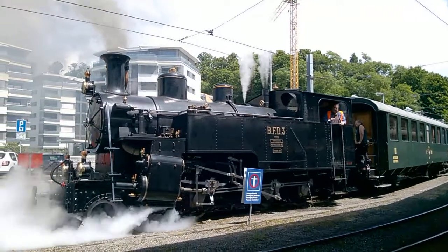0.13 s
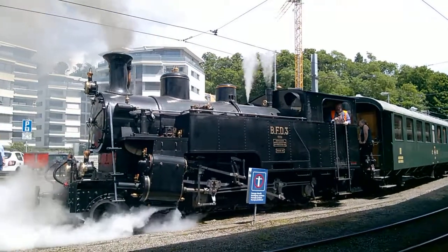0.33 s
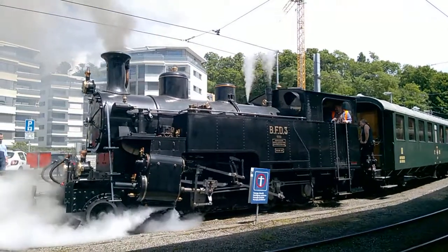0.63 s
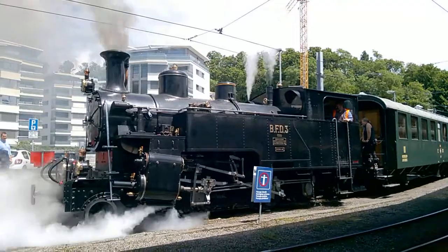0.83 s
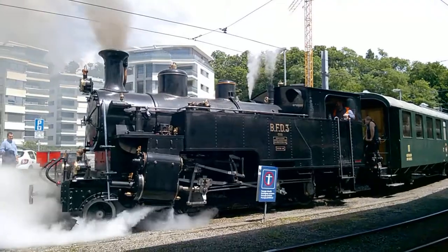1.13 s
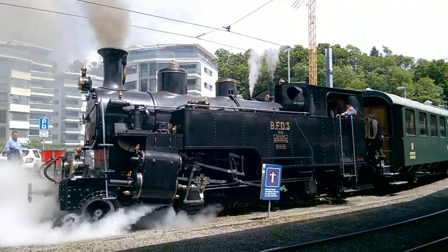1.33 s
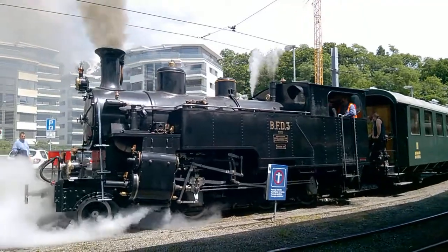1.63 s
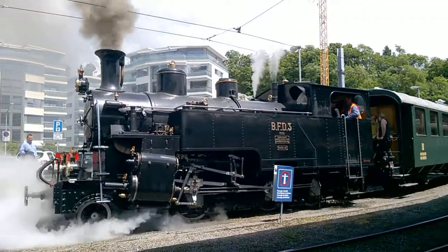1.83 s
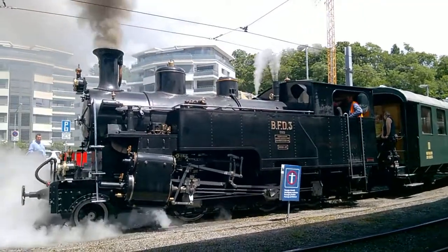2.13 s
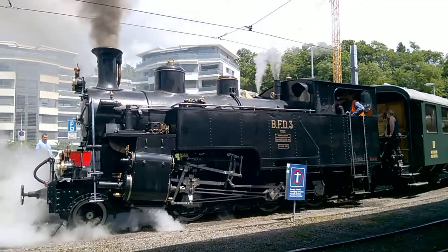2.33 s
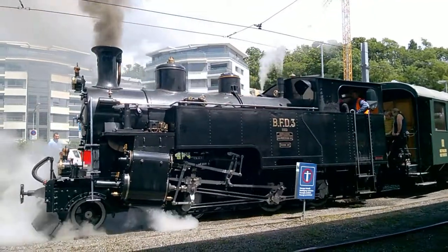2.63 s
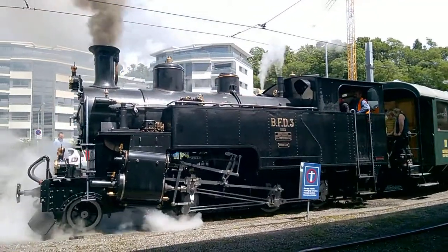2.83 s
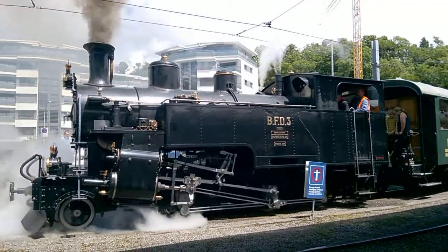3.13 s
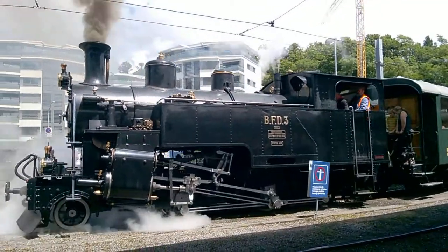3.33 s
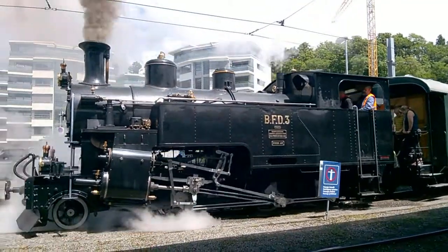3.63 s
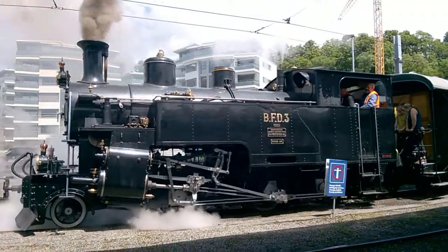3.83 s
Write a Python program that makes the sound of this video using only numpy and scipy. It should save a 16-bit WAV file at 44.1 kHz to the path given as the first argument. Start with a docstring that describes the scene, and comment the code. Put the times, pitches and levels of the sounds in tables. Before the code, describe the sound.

Loud, bright, rough steam hiss from a locomotive's drain pipe starts at full force, steady until about 0.5 s, then weakens in steps, its shrill edge sinking, gone by 2 s. A soft low chuff comes at 1.8 s, a weak spurt around 2.3-2.7 s, then a quieter, faintly whistling jet swells to 3.5 s and drops by 3.9 s. Smooth leaking steam and very faint wavering low hum and rumble continue beneath; open air, nearly mono.

```python
"""Steam locomotive with open drain cocks

A steam locomotive creeps through a station. A strong jet hisses through its drain pipe and dies away,
its shrill edge sinking with the pressure; a short spurt and a weaker second jet follow.
Each jet is flickering turbulence noise, shaped by flow, and the two main jets also by pressure.
Steam leaks steadily from the boiler top as smoother-coloured noise, and the chimney gives one soft chuff
of low noise. The engine rumbles as filtered noise and hums as two tones of wavering pitch."""
import sys
import numpy as np
from scipy import signal
from scipy.fft import rfft, irfft
from scipy.io import wavfile

SR = 44100
rng = np.random.default_rng(int(sys.argv[2]) if len(sys.argv) > 2 else 0)


def bounce(signal):
    """Save signal as a 16-bit WAV file at the path given by the first command-line argument."""
    frames = np.transpose(np.atleast_2d(signal))
    limited = np.clip(frames, -1, 1)
    pcm = np.round(limited * 32767).astype(np.int16)
    wavfile.write(sys.argv[1], SR, pcm)


N = 176400  # samples: 4 s
FRAME, HOP = 1024, 256  # samples per spectral frame, and between frames
TIME = np.arange(N) / SR
FRAME_S = np.arange(N // HOP + 2) * HOP / SR
BIN_HZ = np.maximum(np.arange(FRAME // 2 + 1) * SR / FRAME, 1)[:, None]


def from_db(db):
    """Logarithmic level: 20 dB is a tenfold amplitude."""
    return 10 ** (np.asarray(db) / 20)


def at_hz(rows, hz, axis=1):
    """Spectral envelope: one column of a table, interpolated over log frequency."""
    rows = np.array(rows)
    return np.interp(np.log(hz), np.log(rows[:, 0]), rows[:, axis])


def in_time(rows):
    """Temporal envelope: a curve interpolated at every frame."""
    times, values = np.transpose(rows)
    return np.interp(FRAME_S, times, values)


def bump(hz, centre_hz, width_hz):
    """Bell-shaped (Gaussian) band of height 1, with its width taken at half height."""
    return 2 ** -((2 * (hz - centre_hz) / width_hz) ** 2)


# Flow of the first jet before the shut-off: [t/s, level/dB]
FIRST_FLOW = [(0, -27.5), (.025, -29), (.055, -34), (.08, -35.5), (.112, -29.5), (.28, -29), (.355, -29.6),
              (.383, -32.5), (.415, -30), (.54, -30), (.7, -34.5), (.745, -32), (.83, -36), (1.07, -35.5),
              (1.14, -38), (1.21, -44), (1.28, -38), (1.38, -40), (1.435, -45.5), (1.48, -42), (1.56, -44),
              (1.66, -41.3), (1.8, -44.5), (1.95, -54)]
# Flow of the short spurt: [t/s, level/dB]
SPURT_FLOW = [(1.8, -64), (2.12, -58), (2.26, -49), (2.45, -48.5), (2.65, -50), (2.73, -55.5), (3.0, -54),
              (3.3, -56)]
# Flow of the second jet: [t/s, level/dB]
SECOND_FLOW = [(1.9, -71), (2.25, -59), (2.5, -49), (2.72, -50.5), (2.87, -49.5), (3.13, -45), (3.52, -43),
               (3.73, -44.8), (3.81, -48.5), (3.88, -55.5), (4.0, -62)]
# Pressure behind each main jet, relative to full: [t/s, level/dB]
FIRST_PRESSURE = [(0, 0), (.5, -1), (.85, -3.5), (1.25, -9), (1.9, -19)]
SECOND_PRESSURE = [(2.2, -8), (2.85, -8), (3.4, 0.5), (3.75, -1), (4, -4)]
# Turbulence at the full flow: [f/Hz, level/dB per Hz, gain/dB per dB of flow]
FIRST_HISS = [(100, -89.5, 2.5), (239, -91, -0.5), (404, -85, .5), (610, -75.5, 0), (1130, -79, 0.61),
              (1840, -72, 0.46), (3100, -75.5, .85), (4360, -71, 0.8), (5800, -75, 1), (8000, -73, 0.8),
              (11000, -73, 1.3), (12800, -80, 0.5), (16000, -82, 1.5)]
SPURT_HISS = [(100, -104, 0.54), (400, -93.5, .7), (750, -83.5, 1), (1300, -91, 0.43), (2500, -91.5, 1),
              (4300, -87.5, 0.44), (6000, -87, 1), (8000, -89, 1), (10000, -88.5, 1), (12000, -92, 1),
              (16000, -109, 1)]
SECOND_HISS = [(100, -103, .5), (400, -97, 0.36), (710, -91, 1), (1320, -92, 1), (1800, -84, 0.55),
               (2460, -88.5, 0.27), (4640, -86, 0.73), (8000, -87, 0.8), (10000, -89, 1), (12100, -94, 1),
               (14000, -99, 1), (16000, -108, 0.84)]
# Drain pipe resonances at full pressure: [f/Hz, width/Hz, lift/dB, lift gained/dB per dB of pressure]
FIRST_PIPE = [(740, 130, 2.5, .15), (1005, 60, 1.8, .2), (1312, 165, 14.8, 0), (1550, 130, -4, 0),
              (1760, 200, 4.7, 0), (2010, 120, 4.8, 0), (2340, 300, 10.3, .25), (2910, 130, 4, 0),
              (3970, 130, 2.5, .1), (4880, 400, 5.2, .7), (7600, 400, 2.8, .3), (9400, 400, 5.8, 1),
              (14350, 800, 7, 1.3)]
SPURT_PIPE = [(864, 81, 5, 0), (4050, 270, 4, 0), (5550, 300, 3, 0), (9350, 600, 7.1, 0)]
SECOND_PIPE = [(1181, 53, 25, 0), (1540, 144, 10.7, -0.3), (1860, 60, 7.9, 0), (2060, 190, 8, 0.22),
               (2970, 130, 5, -0.045), (4180, 89, 4.8, -.3), (4860, 130, 3, -0.28), (5422, 720, 5.4, 0.24),
               (6690, 220, 5, -0.28), (7540, 1000, 4.6, -0.05), (9450, 350, 4, 0)]
# Shrill orifice bands at full pressure: [f/Hz, width/Hz, lift/dB, glide/Hz per dB of pressure]
FIRST_SHRILL = [(8650, 1800, 5.2, 125)]
SECOND_SHRILL = [(10650, 890, 7.8, 52), (13600, 550, 7, 25)]
FIRST_FULL_DB, SPURT_FULL_DB, SECOND_FULL_DB = -30, -48, -43.5  # flow at full pressure, dB


def drain_cocks(shut_s=1.426, shut_length_s=0.59):
    """Superposition of jets: the first is slowly shut off, a spurt follows and the second builds up."""
    still_open = np.clip(1 - (TIME - shut_s) / shut_length_s, 0, 1)
    first_pressure = in_time(FIRST_PRESSURE)
    second_pressure = in_time(SECOND_PRESSURE)
    first = jet(FIRST_FLOW, FIRST_FULL_DB, FIRST_HISS, FIRST_PIPE, FIRST_SHRILL, first_pressure)
    spurt = jet(SPURT_FLOW, SPURT_FULL_DB, SPURT_HISS, SPURT_PIPE)
    second = jet(SECOND_FLOW, SECOND_FULL_DB, SECOND_HISS, SECOND_PIPE, SECOND_SHRILL, second_pressure)
    return still_open * first + spurt + second


def jet(flow, full_db, hiss, pipe, shrill=(), pressure_db=0):
    """Jet noise: flow sets level and colour; pressure drives pipe resonances and moves the shrill bands."""
    flow_db = in_time(flow) - full_db
    db = at_hz(hiss, BIN_HZ) + at_hz(hiss, BIN_HZ, axis=2) * flow_db
    for hz, width, lift_db, growth in pipe:
        # low pressure can flatten a peak but not turn it into a dip
        lift_now = np.maximum(lift_db + growth * pressure_db, min(lift_db, 0))
        db = db + lift_now * bump(BIN_HZ, hz, width)
    for hz, width, lift_db, glide in shrill:
        db = db + lift_db * bump(BIN_HZ, hz + glide * pressure_db, width)
    return steam_noise(db)


def steam_noise(db):
    """Turbulence as random noise: white noise weighted frame by frame to a flickering dB per Hz."""
    db = db + flicker()
    white = rng.standard_normal((len(FRAME_S) - 1) * HOP) * np.sqrt(SR / 2)
    frames = signal.stft(white, nperseg=FRAME, noverlap=FRAME - HOP)[2]
    shaped = frames * from_db(db)
    return signal.istft(shaped, nperseg=FRAME, noverlap=FRAME - HOP)[1][:N]


SPUTTER_DB, SPUTTER_PER_S = 0.31, 14  # unsteadiness shared by all bands: spread, corner rate
FLICKER_DB, FLICKER_PER_S = 0.76, 9.7  # unsteadiness of each band's own


def flicker(count=28):
    """Random level modulation in dB: one swing shared by all bands, and one of each band's own."""
    own = drift((count,), FLICKER_PER_S)
    place = np.sqrt(BIN_HZ / (SR / 2)) * (count - 1)  # bands widen towards the treble
    overlap = bump(place, np.arange(count), np.sqrt(2))
    return SPUTTER_DB * drift((), SPUTTER_PER_S) + FLICKER_DB * overlap @ own


def drift(shape, per_s):
    """Low-pass filtered chance: a slow random curve along the frames, of spread 1."""
    r = np.exp(-2 * np.pi * per_s * HOP / SR)
    chance = rng.standard_normal(shape + (2 * len(FRAME_S),))
    slow = signal.lfilter([1], [1, -2 * r, r * r], chance)
    slow = slow[..., len(FRAME_S):]  # the first half lets the filter settle
    return slow / slow.std()


# Spectrum of the steady leak: [f/Hz, level/dB per Hz]
LEAK = [(100, -102), (250, -108.5), (400, -91), (650, -87.5), (900, -87), (1200, -93), (1900, -87.5),
        (2600, -93.5), (4300, -88.5), (7300, -88), (10000, -88.5), (12500, -92.5), (14500, -101),
        (16000, -103)]
# Change of that level as the engine moves on: [t/s, level/dB]
LEAK_LEVEL = [(0, 1.5), (1.9, 0.3), (2.5, -2.2), (2.9, -2.5), (3.75, -3.5), (4.0, -9)]


def leak():
    """Broadband leakage noise from the boiler top: one fixed spectrum, slowly changing in level."""
    return steam_noise(at_hz(LEAK, BIN_HZ) + in_time(LEAK_LEVEL))


CHUFF_S, CHUFF_ATTACK_S, CHUFF_DECAY_S = 1.82, 0.059, 0.16  # start, rise, decay constant
CHUFF_HZ, CHUFF_WIDTH_HZ, CHUFF_DB = 135, 90, -68.5  # band, and RMS level at the peak


def chuff():
    """Exhaust pulse: low band-limited noise from the chimney, rising linearly and dying exponentially."""
    age = TIME - CHUFF_S
    rise = np.clip(age / CHUFF_ATTACK_S, 0, 1)
    decay = np.exp(-np.maximum(age - CHUFF_ATTACK_S, 0) / CHUFF_DECAY_S)
    puff = steady_noise(lambda hz: bump(hz, CHUFF_HZ, CHUFF_WIDTH_HZ))
    return from_db(CHUFF_DB) * rise * decay * puff / puff.std()


# Rumble of the running engine: [f/Hz, level/dB per Hz]
RUMBLE = [(15, -112), (30, -103), (45, -96), (70, -91.5), (100, -88), (130, -92), (200, -100), (320, -95),
          (600, -108)]
# Low tones of the engine: [f/Hz, RMS level/dB, spread of pitch/Hz]
HUM = [(48.6, -75.5, 0.77), (97, -83, 4.04)]


def engine():
    """Noise and frequency modulation: a low rumble, with two tones of randomly wavering pitch."""
    out = steady_noise(lambda hz: from_db(at_hz(RUMBLE, hz)))
    for hz, db, waver_hz in HUM:
        waver = np.interp(TIME, FRAME_S, drift((), per_s=3.8))
        phase = 2 * np.pi * np.cumsum(hz + waver_hz * waver) / SR
        out = out + from_db(db) * np.sqrt(2) * np.sin(phase)
    return out


def steady_noise(gain_at):
    """Stationary noise: white noise filtered to a given amplitude density per root Hz."""
    hz = np.maximum(np.arange(N // 2 + 1) * SR / N, 1)
    spectrum = rfft(rng.standard_normal(N)) * gain_at(hz)
    return irfft(spectrum, N) * np.sqrt(SR / 2)


# Pitches that cancel over the ground: [f/Hz, width/Hz, level/dB]
GROUND_NOTCHES = [(238, 66, -4.5), (462, 71, -11.5), (872, 34, -5), (1090, 36, -3), (1964, 30, -2.5)]


def over_ground(x):
    """Destructive interference: the bounce off the ground carves a few notches."""
    hz = np.arange(N // 2 + 1) * SR / N
    notches_db = sum(db * bump(hz, centre, width) for centre, width, db in GROUND_NOTCHES)
    return irfft(rfft(x) * from_db(notches_db), N)


# Copies of the steam: [time offset at t = 0/s, change of offset/s per s, level/dB]
OFFSET_COPIES = [(.003, .000005, -18.5), (0.0127, -0.012, -13.5), (0.0207, -.0002, -13.5)]


def with_offset_copies(x):
    """Comb filtering by copies at small time offsets: two nearly steady, one sliding from behind to ahead."""
    out = x
    for offset, change, db in OFFSET_COPIES:
        read_at = TIME - offset - change * TIME
        out = out + from_db(db) * np.interp(read_at, TIME, x, left=0)
    return out


SIDE_DB, SIDE_DELAY_S, SIDE_FROM_HZ = -54, .013, 6500  # very faint left-right difference in the treble


def scene():
    """Sum and difference: a very faint delayed treble copy is added with opposite sign left and right."""
    steam = with_offset_copies(over_ground(drain_cocks() + leak()))
    delayed = np.interp(TIME - SIDE_DELAY_S, TIME, steam, left=0)
    high_pass = signal.butter(2, SIDE_FROM_HZ, "high", fs=SR, output="sos")
    side = from_db(SIDE_DB) * signal.sosfilt(high_pass, delayed)
    return steam + engine() + chuff() + side * np.array([[1], [-1]])


CUTOFF_HZ = 15700


def record(dry):
    """Band limitation: a steep elliptic low-pass removes the extreme treble."""
    low_pass = signal.ellip(12, .1, 80, CUTOFF_HZ, fs=SR, output="sos")  # ripple, stopband in dB
    return signal.sosfilt(low_pass, dry)


dry = scene()
out = record(dry)
bounce(out)
```